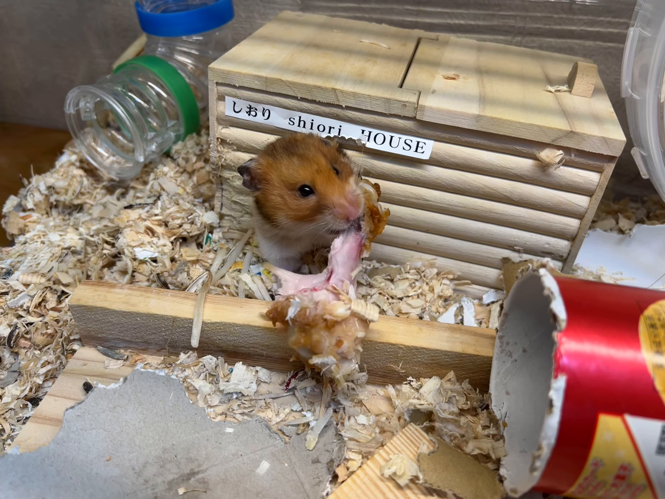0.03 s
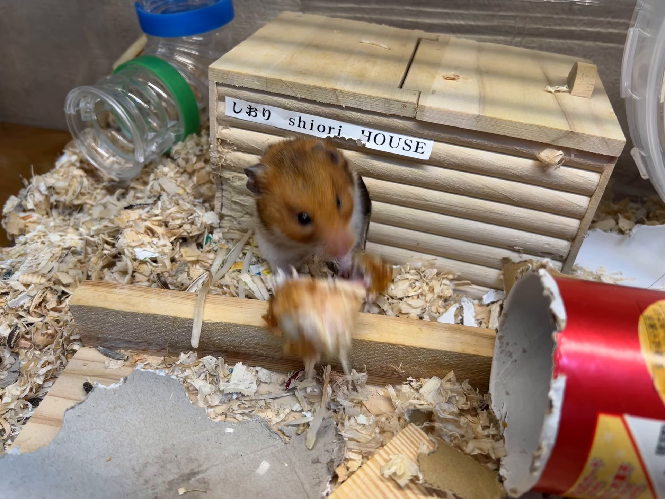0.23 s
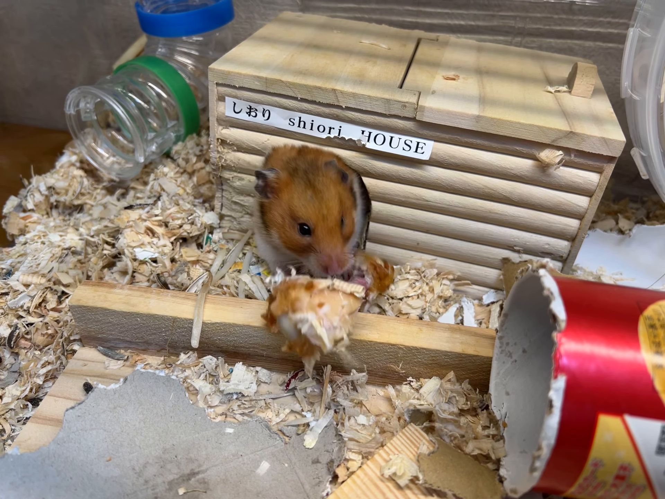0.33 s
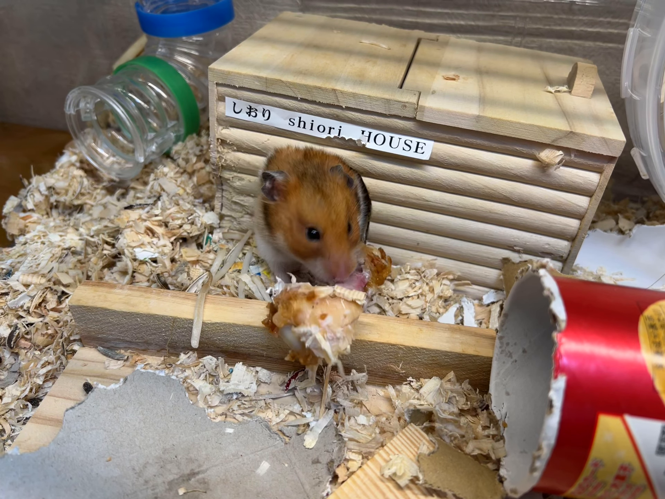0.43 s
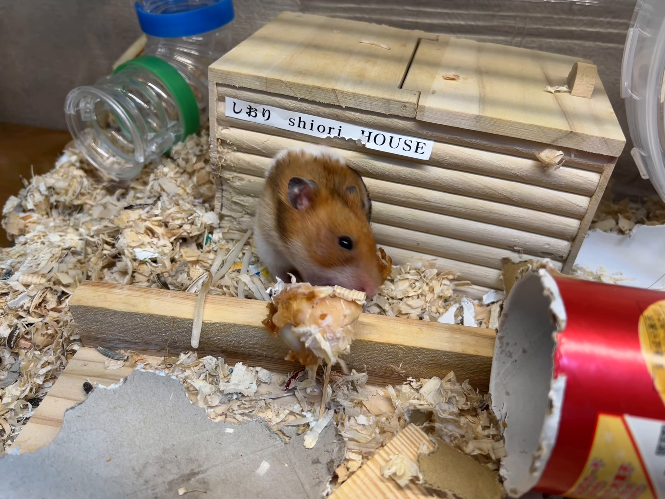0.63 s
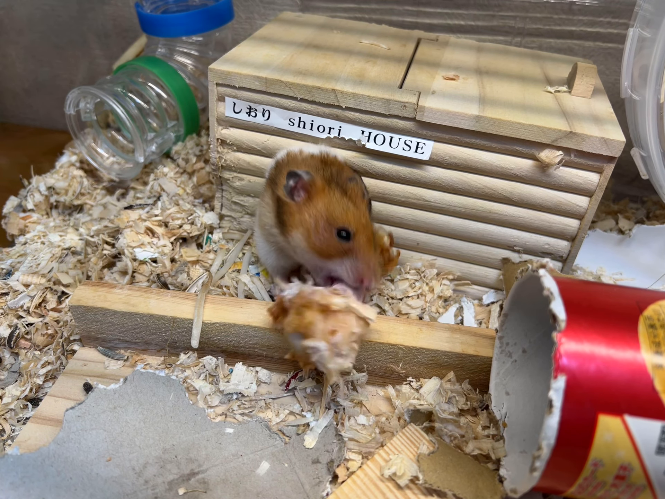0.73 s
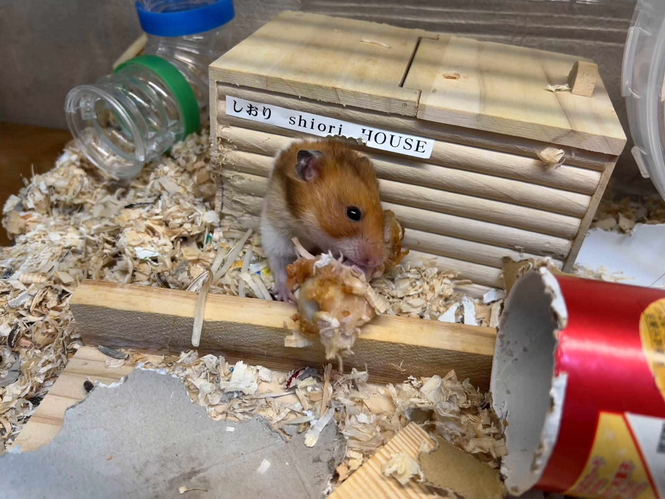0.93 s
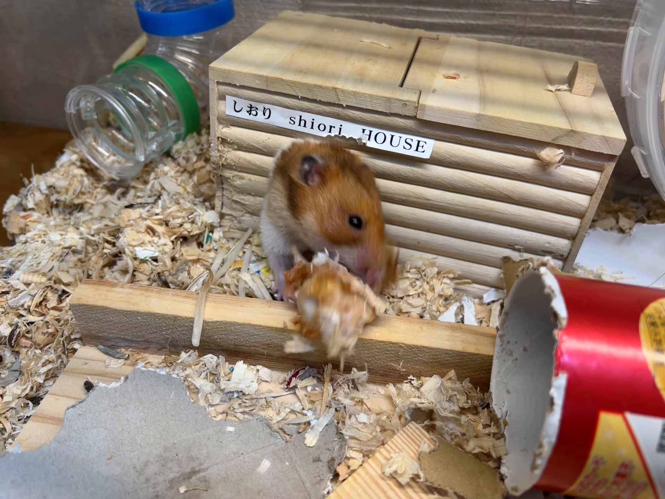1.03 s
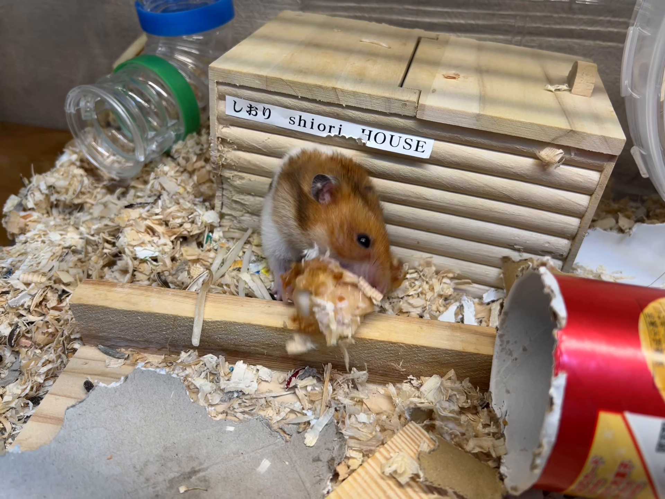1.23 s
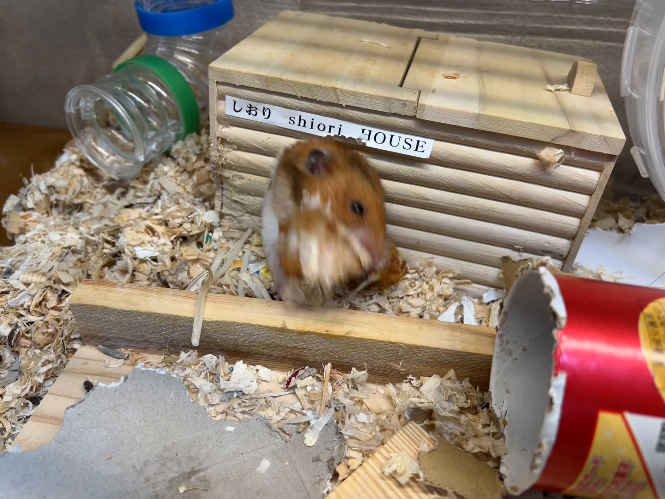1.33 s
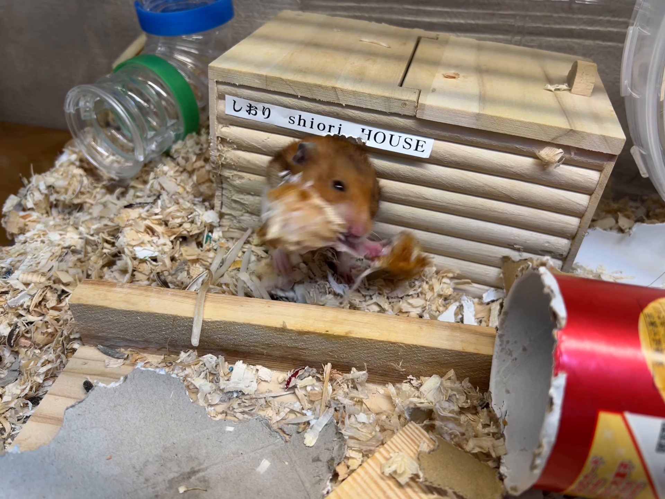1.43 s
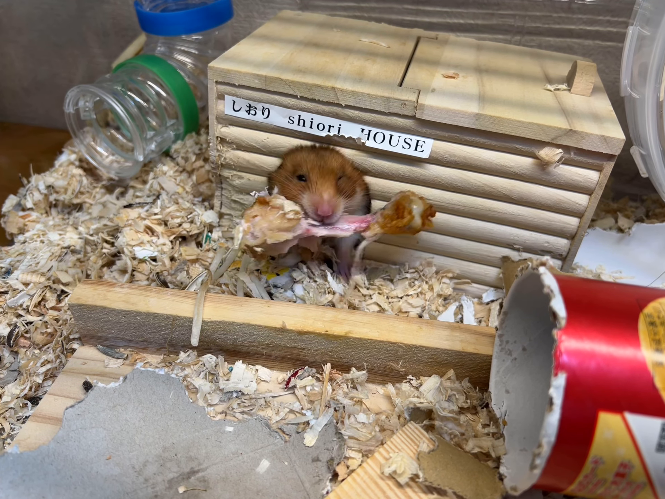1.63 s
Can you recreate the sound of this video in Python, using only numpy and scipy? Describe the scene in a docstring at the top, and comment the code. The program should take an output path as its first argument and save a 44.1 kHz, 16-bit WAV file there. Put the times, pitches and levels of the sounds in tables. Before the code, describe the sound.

Bone thumping and clacking on wood as a hamster gnaws it, faint crunches, shavings rustling at the end

```python
"""Dull thumps boom, hard knocks clack and small dry crunches sound close by in a quiet room.
A hamster gnaws and tugs at a bone in a cage of wood shavings, which rustle most near the end,
when the bone is lifted and turned. Thumps and knocks are fading sine waves plus noise with a room tail.
Crunches and rustles mix tiny random clicks with hiss; the scrape and the background are coloured noise."""
import sys
import numpy as np
from scipy import signal
from scipy.fft import rfft, irfft, next_fast_len
from scipy.io import wavfile
from scipy.ndimage import uniform_filter1d

SR = 44100
rng = np.random.default_rng(int(sys.argv[2]) if len(sys.argv) > 2 else 0)


def master(y):
    """Save y as 16-bit WAV."""
    cut = np.clip(np.atleast_2d(y).T, -1, 1)
    pcm = np.round(cut * 32767)  # scale
    wavfile.write(sys.argv[1], SR, pcm.astype(np.int16))


N = 74970  # length in samples
T = np.arange(N) / SR  # time in seconds

# A "t60" is the time in seconds that a sound takes to fade by 60 dB.
# Dull thumps on the cage floor. Each row: start in seconds, level in dB, pitch of the push in Hz,
# width of the push in cycles, floor ringing in dB, t60 of the damping by the contact in seconds,
# diffuse boom in dB (ringing and boom are relative to the push).
THUMPS = [(0.215, -30.5, 107, 2.3, -14, .3, -29), (0.2329, -14.5, 136.6, 0.78, -4, 7.4, -15),
          (0.689, -39, 134, 2.1, -6.5, 0.59, -18.5), (0.9092, -31.5, 67, 2.15, 6, 0.38, -31.5),
          (1.077, -26, 103.7, 0.7, -10, 0.74, -20), (1.172, -73, 100, 0.55, -3.5, 0.25, -15),
          (1.655, -49.5, 147, 1.6, -13, 0.55, -17)]
# Notes the cage floor rings with. Each row: pitch in Hz, level in dB, t60 in seconds.
FLOOR_MODES = [(85, -26, 1), (105.5, -10, 0.22), (126.3, -7.5, 0.53), (160.8, 3.5, .15), (207.3, -12, 0.31),
               (238.9, -30, 0.35), (310.5, -20.5, 0.26), (373, -23, .18), (403.4, -25, 0.26),
               (508, -45, 0.37)]
# Colour of a thump's diffuse boom. Each row: frequency in Hz, level in dB.
BOOM_COLOUR = [(30, -40), (55, -1), (150, 4.5), (260, -4.5), (500, -24), (900, -34.5), (1600, -48),
               (4000, -86)]
THUMP_RISE_S, BOOM_RISE_S = 0.0051, 0.004
PUSH_PEAK_CYCLES = 1.57  # the push is strongest this many cycles after it starts

# The bone knocks on wood. Each row: start in seconds, level in dB, treble tilt in dB per octave
# above 500 Hz, pitch of the struck spot in Hz, level of that spot in dB.
KNOCKS = [(0.017, -57.5, 3, 438, -9), (0.228, -34, -14, 576, -3), (0.719, -64, -0.5, 1000, -1),
          (0.8943, -47.5, 1, 550, -32), (0.9037, -27.5, 1.5, 504, -1), (1.279, -58.5, 3, 379, 10),
          (1.441, -59.5, 5.5, 800, -1), (1.638, -54, 1, 415, 9.5)]
# Notes bone and wood ring with. Each row: pitch in Hz, level in dB, t60 in seconds.
WOOD_MODES = [(296.5, -18, 0.32), (356, -16.5, 0.26), (422.5, -18, 0.4), (451, -5, 0.11), (597, -3, 0.03),
              (763, -15, 0.083), (782, -33, 0.76), (917, -15.5, 0.2), (983, -11.5, 0.033),
              (1061, -13.5, 0.07), (1110, -14, 0.13), (1260, -20, 0.12), (1526, -24, 0.15),
              (2272, -17.5, 0.041), (3150, -54, 0.051)]
# Colour of the contact noise. Each row: frequency in Hz, level in dB.
CLACK_COLOUR = [(150, -37), (420, 15.5), (1200, 8.5), (1450, 1.5), (2400, -3.5), (3300, -8), (4200, -21),
                (5400, -32), (8000, -57), (15000, -54)]
CLACK_DB, CLACK_T60_S, KNOCK_ROOM_DB = -3, 0.0083, -12.5
KNOCK_RISE_S, SPOT_T60_S = 0.0005, 0.058
WOOD_BLUR_HZ = 8.5  # the loose contact smears each note a little
# How slowly the room fades. Each row: frequency in Hz, t60 in seconds.
ROOM_T60 = [(60, 0.57), (130, 0.33), (300, 0.36), (800, .24), (2000, 0.14), (5000, .12), (15000, 0.05)]

# Crunches of teeth on bone. Each row: start in seconds, level in dB, rise in seconds, t60 in seconds,
# pitch of the resonance in Hz, height of that resonance in dB.
CRUNCHES = [(0.016, -50.5, 0.00092, 0.028, 10800, -3.5), (0.04, -63, 0.00081, 0.043, 14100, 28),
            (0.226, -56.5, .002, 0.07, 2780, 13.5), (0.276, -56, 0.0014, 0.1, 11500, 5.5),
            (0.367, -67, 0.0034, 0.084, 10200, 6), (0.455, -73, 0.00091, 0.033, 10700, 13),
            (0.56, -64, .007, 0.042, 11900, 6), (0.632, -64.5, 0.00088, 0.028, 6900, 32),
            (0.663, -68.5, 0.001, 0.17, 6000, 21), (0.702, -67.5, 0.0031, 0.25, 6700, 4),
            (0.8, -67.5, 0.0014, 0.047, 11100, -4), (0.889, -54.5, 0.0019, 0.049, 12000, 12),
            (1.053, -68, 0.0026, 0.014, 7500, 22), (1.071, -52, 0.0059, 0.13, 7850, 3.5),
            (1.125, -65.5, 0.003, 0.1, 7200, 7.5), (1.183, -69, 0.0015, 0.027, 12900, 19),
            (1.256, -69, 0.0017, 0.044, 7500, 8), (1.307, -65.5, 0.0015, 0.094, 3340, 8.5)]
# Colour of a crunch before its resonance. Each row: frequency in Hz, level in dB.
CRUNCH_COLOUR = [(200, 12), (1000, 2.5), (2000, -2.5), (3400, 0), (4700, -3), (7300, -1), (9300, -2.5),
                 (11300, 1.5), (15500, -1.5)]
CRUNCH_GRAINS_PER_S, CRUNCH_HISS_SHARE = 1400, 0.83  # share of the power that is smooth hiss
CRUNCH_WIDTH_OCT = 0.28  # distance in octaves at which the resonance has half its dB height

# Loudness of the rustling shavings. Each row: time in seconds, level in dB.
RUSTLE_LEVEL = [(0, -65.5), (.03, -70.5), (.07, -77.5), (.15, -83), (.21, -74.5), (.32, -69.5),
                (.42, -82.5), (.5, -82.5), (.6, -76), (.75, -80.5), (.83, -82), (.87, -69.5), (.99, -86),
                (1.03, -72.5), (1.13, -79), (1.17, -84), (1.23, -83), (1.28, -73), (1.34, -80), (1.39, -72),
                (1.445, -62), (1.5, -65), (1.56, -67), (1.62, -66.5), (1.66, -60), (1.7, -57.5)]
# Colour of the rustle. Each row: frequency in Hz, level in dB.
RUSTLE_COLOUR = [(200, -43), (600, -4.5), (1300, -7.5), (2000, -6), (2400, -6.5), (3100, -7.5), (5600, -11),
                 (7400, -9), (9500, -14.5), (10700, -7), (15500, -17)]
RUSTLE_GRAINS_PER_S, RUSTLE_HISS_SHARE, RUSTLE_PATCHY_DB = 2200, 0.64, 3

# Loudness of the bone scraping on wood. Each row: time in seconds, level in dB.
SCRAPE_LEVEL = [(0, -62.5), (.08, -92), (.16, -84.5), (.8, -82), (1.03, -79), (1.2, -96), (1.33, -85),
                (1.37, -69.5), (1.43, -64.5), (1.5, -81.5), (1.62, -80.5), (1.66, -56.5), (1.7, -63)]
# Colour of the scrape. Each row: frequency in Hz, level in dB.
SCRAPE_COLOUR = [(200, -28), (320, -9), (395, 5), (480, -23), (600, -14.5), (780, -10.5), (950, -42),
                 (1100, -20), (2000, -40)]

# Loudness of the low rumble. Each row: time in seconds, level in dB.
RUMBLE_LEVEL = [(0, -55), (.1, -58), (.15, -62), (.45, -62), (.58, -64), (.75, -54.5), (.84, -65),
                (1.0, -53.5), (1.15, -53.5), (1.4, -56.5), (1.55, -60), (1.7, -55.5)]
# Colour of the rumble. Each row: frequency in Hz, level in dB.
RUMBLE_COLOUR = [(25, -83), (40, -16.5), (58, 6.5), (120, 0.5), (175, 0), (240, -12.5), (400, -28),
                 (800, -30), (2000, -53)]
# Colour of the steady background hiss. Each row: frequency in Hz, level in dB.
HISS_COLOUR = [(100, 19), (500, 4), (1500, 6), (4000, -0.5), (11000, -5.5), (15500, -26)]
HISS_DB = -80.5
TOP_HZ = 15700  # the microphone keeps nothing from here up


def thumps():
    """A soft blow pushes the cage floor for a cycle or two and rings its low modes; the room booms after it."""
    out = np.zeros(N)
    floor = sum(amp(db) * fade(t60) * np.sin(2 * np.pi * hz * T) for hz, db, t60 in FLOOR_MODES)
    attack = rise(THUMP_RISE_S)
    for start_s, db, push_hz, width, ring_db, damping_t60, boom_db in THUMPS:
        cycles = push_hz * T
        push_shape = np.exp(-((cycles - PUSH_PEAK_CYCLES) / width) ** 2)
        push = attack * push_shape * np.sin(2 * np.pi * cycles)
        ring = amp(ring_db) * attack * fade(damping_t60) * floor
        boom = amp(boom_db) * rise(BOOM_RISE_S) * room_tail(BOOM_COLOUR)
        add(out, start_s, amp(db) * (push + ring + boom))
    return out


def knocks():
    """Hard contacts: a clack, the struck spot's brief note, the modes of bone and wood, a short room tail."""
    out = np.zeros(N)
    modes = []
    for k, (hz, db, t60) in enumerate(WOOD_MODES):
        sign = (-1) ** k  # every other mode starts the opposite way
        modes.append((hz, sign * amp(db) * fade(t60) * blurred(hz, WOOD_BLUR_HZ)))
    for start_s, db, tilt_db, spot_hz, spot_db in KNOCKS:
        tilt = lambda hz: tilt_db * np.log2(max(hz / 500, 1))
        colour = [(hz, band_db + tilt(hz)) for hz, band_db in CLACK_COLOUR]
        ring = sum(amp(tilt(hz)) * mode for hz, mode in modes)
        spot = amp(spot_db) * fade(SPOT_T60_S) * np.sin(2 * np.pi * spot_hz * T)
        clack = amp(CLACK_DB) * fade(CLACK_T60_S) * noise(colour)
        tail = amp(KNOCK_ROOM_DB) * room_tail(colour)
        add(out, start_s, amp(db) * rise(KNOCK_RISE_S) * (ring + spot + clack + tail))
    return out


def teeth():
    """Each bite is a brief burst of fine fractures, coloured by one resonance of the splintering bone."""
    out = np.zeros(N)
    for start_s, db, rise_s, t60, pitch_hz, peak_db in CRUNCHES:
        octaves_off = lambda hz: np.log2((hz + 1) / pitch_hz)
        resonance = lambda hz: amp(peak_db / (1 + (octaves_off(hz) / CRUNCH_WIDTH_OCT) ** 2))
        fractures = crackle(CRUNCH_COLOUR, CRUNCH_GRAINS_PER_S, CRUNCH_HISS_SHARE)
        burst = unit(filtered(fractures, resonance))
        shape = rise(rise_s) * fade(t60, np.maximum(T - rise_s, 0))
        add(out, start_s, amp(db) * shape * burst)
    return out


def shavings():
    """Movement rustles the bedding; its colour shifts as different flakes rub."""
    rustle = crackle(RUSTLE_COLOUR, RUSTLE_GRAINS_PER_S, RUSTLE_HISS_SHARE)
    return level(RUSTLE_LEVEL) * patchy(rustle, RUSTLE_PATCHY_DB)


def scrape():
    """The dragged bone faintly rubs the wood into a hollow note, made of coloured noise."""
    return level(SCRAPE_LEVEL) * noise(SCRAPE_COLOUR)


def background():
    """A low rumble that swells a little, and a faint steady hiss."""
    rumble = level(RUMBLE_LEVEL) * noise(RUMBLE_COLOUR)
    hiss = amp(HISS_DB) * noise(HISS_COLOUR)
    return rumble + hiss


def room_tail(spectrum):
    """Diffuse sound in which each frequency dies at the room's speed."""
    hz, t, z = signal.stft(noise(spectrum), SR, nperseg=512)
    fading = fade(along(ROOM_T60, hz)[:, None], t)
    return signal.istft(z * fading, SR, nperseg=512)[1][:N]


def crackle(spectrum, grains_per_s, hiss_share):
    """Tiny fractures of random size, mixed with a share of smooth hiss."""
    grains = (rng.random(N) < grains_per_s / SR) * rng.standard_normal(N)
    clicks = unit(filtered(grains, lambda hz: amp(along(spectrum, hz))))
    return np.sqrt(1 - hiss_share) * clicks + np.sqrt(hiss_share) * noise(spectrum)


def patchy(x, depth_db):
    """Random patches of gain over time and frequency, scaled to rms 1."""
    z = signal.stft(x, nperseg=512)[2]
    field = rng.standard_normal(z.shape)
    field = uniform_filter1d(field, size=4, axis=0)  # smooth over frequency
    field = uniform_filter1d(field, size=6, axis=1)  # smooth over time
    return unit(signal.istft(z * amp(depth_db * unit(field)), nperseg=512)[1][:N])


def blurred(hz, blur_hz):
    """A sine whose phase wanders at random, so that its line is blur_hz wide."""
    wander = np.cumsum(rng.standard_normal(N)) * np.sqrt(2 * np.pi * blur_hz / SR)
    return np.sin(2 * np.pi * hz * T + wander)


def noise(spectrum):
    """Coloured noise of rms 1."""
    return unit(filtered(rng.standard_normal(N), lambda hz: amp(along(spectrum, hz))))


def filtered(x, response):
    """Multiply each frequency of x by a response."""
    m = next_fast_len(N + SR // 2)  # spare silence keeps the end from wrapping to the start
    return irfft(rfft(x, m) * response(np.fft.rfftfreq(m, 1 / SR)), m)[:N]


def along(points, hz):
    """Read values between (Hz, value) points on a log frequency axis."""
    f, v = np.transpose(points)
    return np.interp(np.log(hz + 1), np.log(f + 1), v)


def level(points):
    """Gain at every sample from (seconds, dB) points."""
    return amp(np.interp(T, *np.transpose(points)))


def fade(t60, t=T):
    """Exponential decay by 60 dB in t60 seconds."""
    return np.exp(-np.log(1000) * t / t60)


def rise(seconds):
    """Soft attack from silence to full level."""
    return 1 - np.exp(-(T / seconds) ** 2)


def amp(db):
    """Turn decibels into gain."""
    return 10 ** (np.asarray(db) / 20)


def unit(x):
    """Scale to rms 1."""
    return x / np.sqrt(np.mean(x ** 2) + 1e-20)


def add(track, start_s, sound):
    """Mix a sound in at its start time."""
    start = round(start_s * SR)
    track[start:] += sound[:N - start]


def scene():
    """All sources at one microphone."""
    return (thumps() + knocks() + teeth() + shavings() + scrape() + background())[None]


def record(dry):
    """The microphone drops the deepest bass and keeps nothing above its band limit."""
    low_cut = signal.butter(4, 42, "highpass", fs=SR, output="sos")
    # silent below 32 Hz, full from 52 Hz up to the limit
    band = lambda hz: np.clip((hz - 32) / 20, 0, 1) ** 2 * (hz < TOP_HZ)
    return filtered(signal.sosfilt(low_cut, dry[0]), band)[None]


dry = scene()
out = record(dry)
master(out)
```